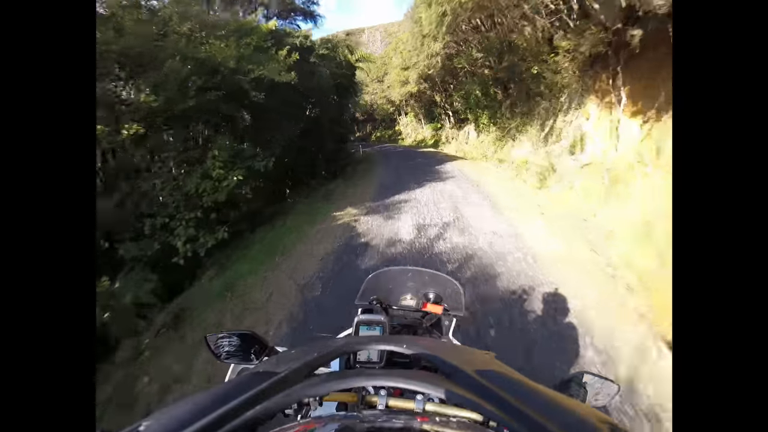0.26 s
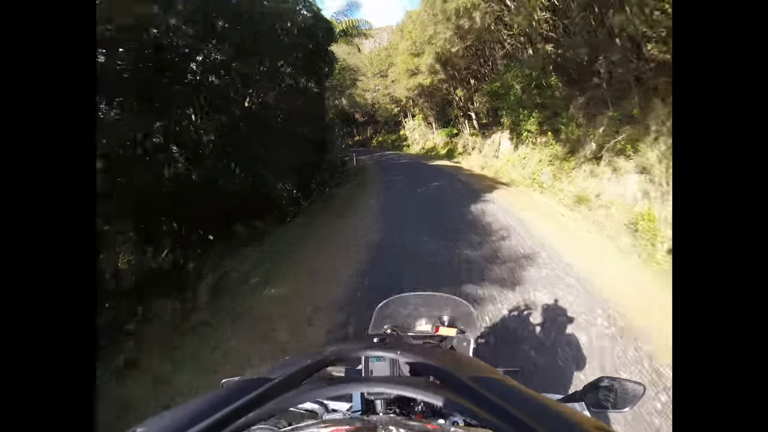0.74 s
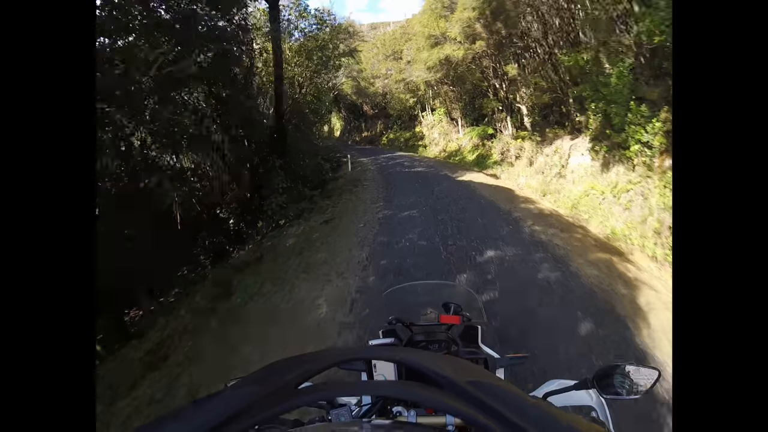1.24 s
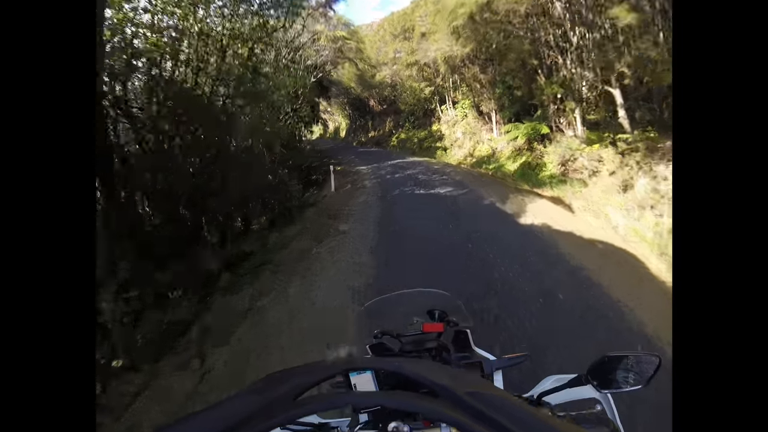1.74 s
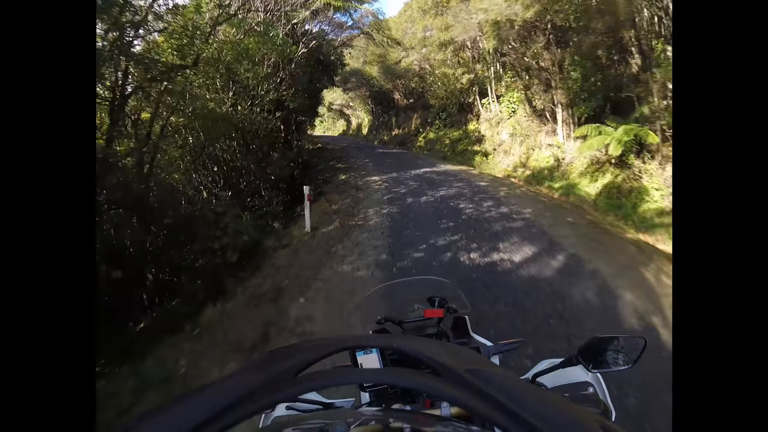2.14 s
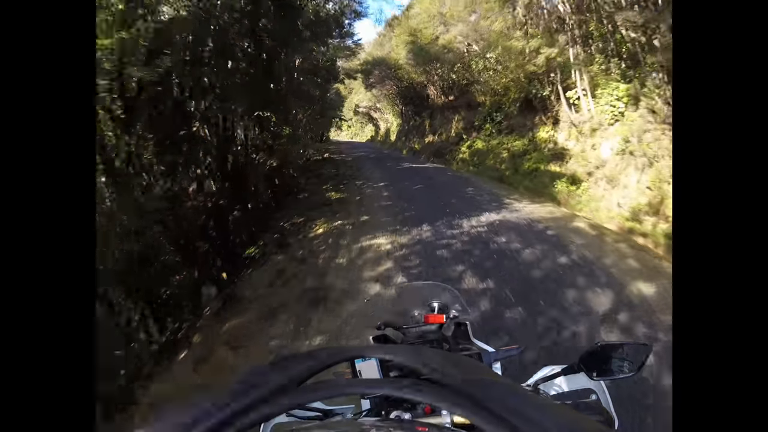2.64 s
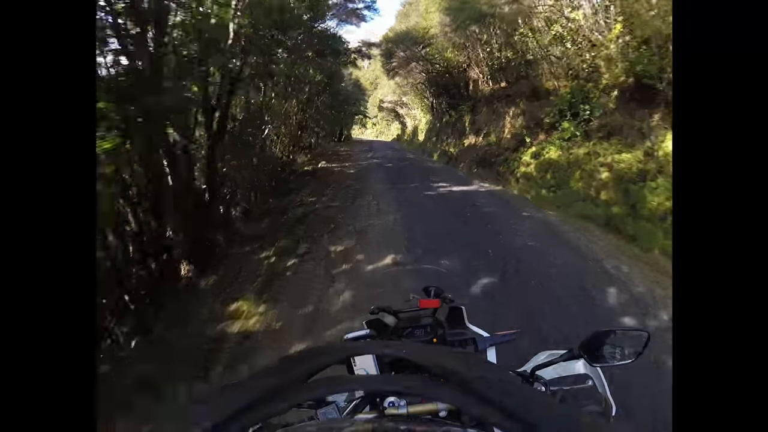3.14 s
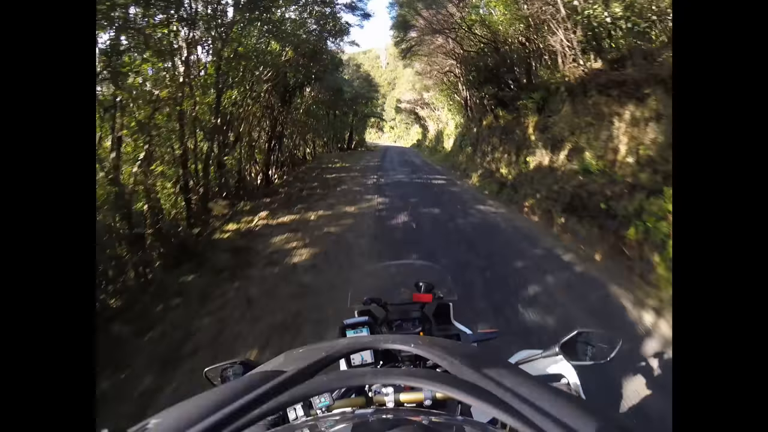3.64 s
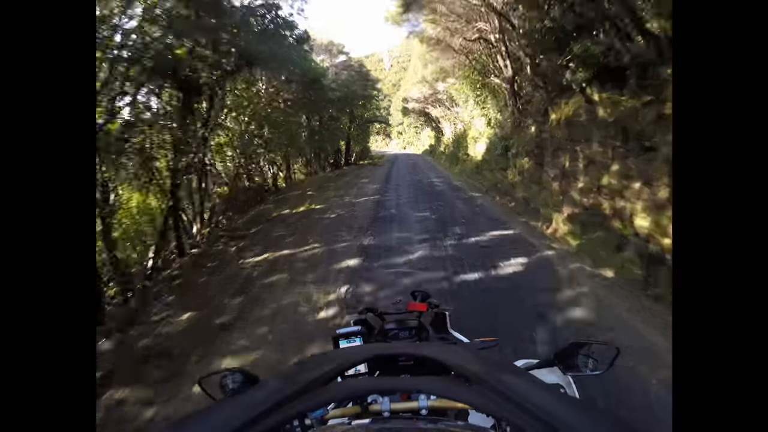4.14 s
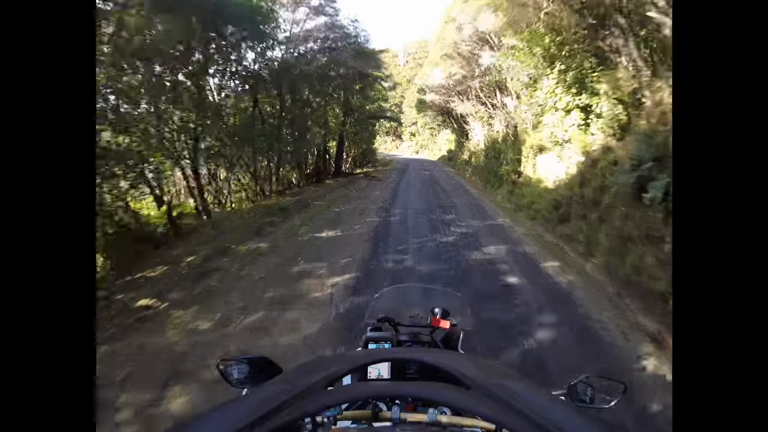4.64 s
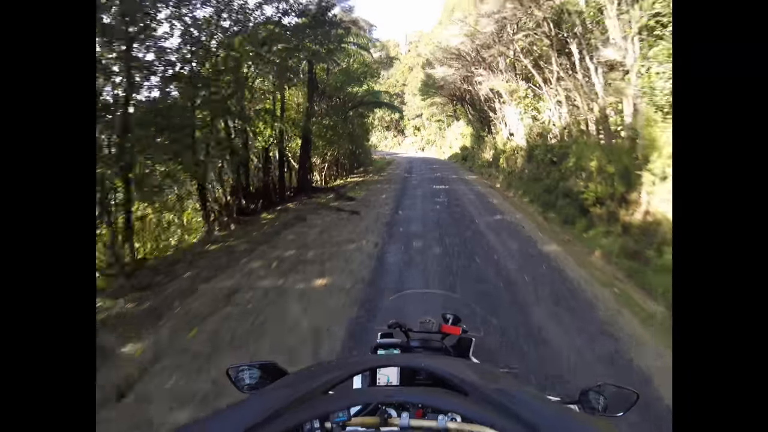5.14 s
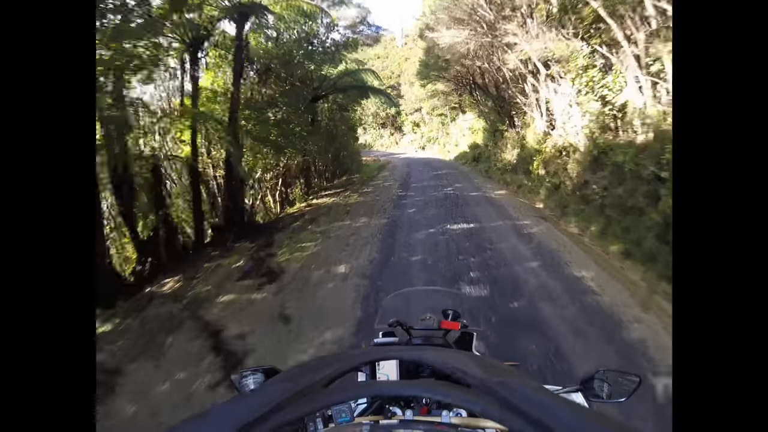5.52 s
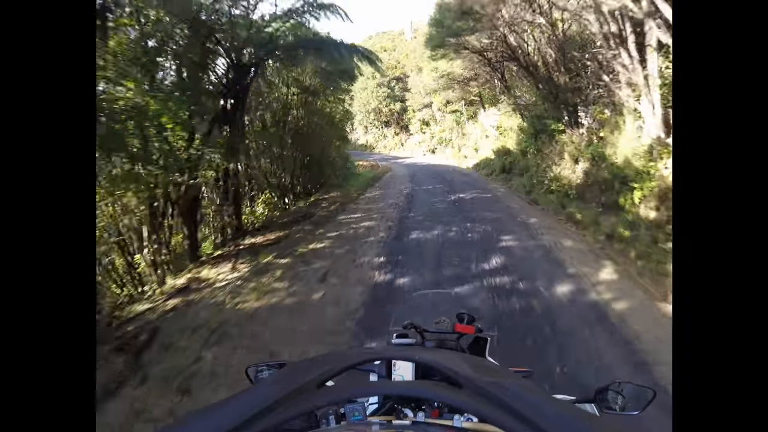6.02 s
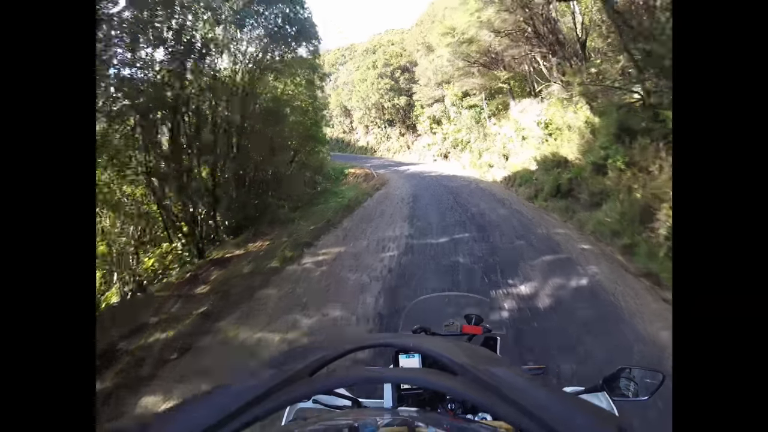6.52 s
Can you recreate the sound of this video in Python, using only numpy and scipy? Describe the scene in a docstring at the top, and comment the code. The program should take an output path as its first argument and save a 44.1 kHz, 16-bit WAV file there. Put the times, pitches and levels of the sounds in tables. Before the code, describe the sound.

Low, lumpy motorcycle engine note climbs under throttle, then drops away as it coasts, with gritty tyre roar, wind rumble, stone knocks and metallic ticks.

```python
"""A motorcycle growls along a gravel road in rushing wind, with stones knocking and metal ticking.
Its twin engine fires unevenly; each firing rings the pipe, silencer and intake as decaying tones.
The intake gets louder as the throttle opens, and a low drone comes up as the engine stops pulling.
Wind on the microphone case and tyres on gravel are shaped noise; stones and ticks are short bursts.
A gain control then holds down the loud moments."""
import sys
import numpy as np
from scipy import signal
from scipy.io import wavfile
from scipy.ndimage import uniform_filter1d

SR = 44100
rng = np.random.default_rng(int(sys.argv[2]) if len(sys.argv) > 2 else 0)


def materialize(psi):
    """Save the field psi as 16-bit PCM at rate SR to the path in sys.argv[1].

    A 1-D psi becomes a single channel; in a 2-D psi each row is a channel.
    """
    bounded = np.clip(np.atleast_2d(psi).T, -1, 1)
    quanta = np.round(bounded * 32767).astype(np.int16)
    wavfile.write(sys.argv[1], SR, quanta)


N = 298557

# Engine timing; one cycle is a full four-stroke cycle, in which both cylinders fire once
CRUISE_HZ = 26   # cycles per s at which the level laws below need no speed correction
SECOND_FIRING = 3 / 8   # a 270 degree crank fires the other cylinder 3/8 of a cycle later
SECOND_DB, UNEVEN_DB = -1.0, .6   # weaker second cylinder, spread from firing to firing
WOBBLE = .0009   # spread of the firing times, in cycles

# The second cylinder's shorter header brings its pulse out earlier, by a different lead in each part.
# The silencer and intake leads build up over a range of speed above cruise (cycles per s).
PIPE_LEAD_S = .00043
SILENCER_LEAD_S, SILENCER_LEAD_HZ = .00065, (0.6, 2.4)
INTAKE_LEAD_S, INTAKE_LEAD_HZ = .00035, (1.5, 2.6)   # the intake note also moves up over this range

# Engine level laws: (start [dB], change at full share [dB], change per cycle/s over cruise at full share [dB])
# The share is the pull for the drone, the firing strength for the crank, the opening for the intake.
DRONE_LAW, CRANK_LAW, INTAKE_LAW = (-10.5, -23, 1.6), (-21, 1.8, 0.23), (-45.5, 28.75, 0.13)
FULL_FIRING_OPENING = 0.077   # throttle opening from which the crank shakes fully
LOPE_DB = -8.5   # once-a-cycle lope, over the silencer level
SWING_DB = (2.5, 3.5, 1.3)   # how far lope, crank and drone waver
PIPE_TOP_HZ, PIPE_TOP_WIDTH_HZ = 167.2, 56.4   # the pipe's upper resonance

# Tyre level laws: (coasting [dB], gain wide open [dB], gain per cycle/s over cruise [dB])
ROAR_LAW, HISS_LAW = (-36.5, 7.03, 0.81), (-52, 7.75, 1.01)
DRIVE_SMOOTHING_S = 0.086   # the throttle is averaged this far to either side
PANEL_HZ, PANEL_WIDTH_HZ, PANEL_HITS_PER_S, PANEL_DB = 2600, 130, 300, -20   # dB over the roar
SIZZLE_HZ, SIZZLE_WIDTH_HZ = 5510, 660   # bright band in the hiss
SIZZLE_DB, SIZZLE_DB_PER_HZ = -13.5, 1   # over the hiss, and per cycle/s over cruise

GRIT_PER_S, GRIT_DB = 92, -37   # small stones; weakest blow before it rings
TICK_WIDTH = .42   # share of pitch
STONE_CLICK, TICK_CLICK = 9, 5   # first contact, against noise of spread 1
CASE_CUTOFF_HZ = 11500

CEILING_DB, SQUEEZE = -13.5, 0.35   # this share of any excess over the ceiling is taken off
RELEASE_DB_S, ATTACK_S = 60.5, 0.0036
MAKEUP_DB, CUTOFF_HZ, FADE_OUT_S = 3.0, 15600, .004


def from_db(db):
    """Turn decibels into a gain."""
    return 10 ** (np.asarray(db) / 20)


def rms_one(x):
    """Scale a sound so that its rms (average strength) is 1."""
    return x / np.sqrt(np.mean(x ** 2) + 1e-20)


def in_time(rows):
    """Read each column of a time table at every sample, joining its points by straight lines."""
    seconds, *columns = np.transpose(rows)
    return [np.interp(np.arange(N) / SR, seconds, column) for column in columns]


def drift(rate):
    """Slow random wandering of spread 1: smoothed noise, faster with a higher rate [Hz]."""
    # made at one point per 40 samples; the first 2000 points let the filter settle
    r = np.exp(-80 * np.pi * rate / SR)
    slow = signal.lfilter([1], [1, -2 * r, r * r], rng.standard_normal(N // 40 + 2002))[2000:]
    return np.interp(np.arange(N) / 40, np.arange(len(slow)), rms_one(slow))


def resonate(x, hz, width_hz):
    """Ring one resonance, with gain 1 at its peak; a narrower one rings longer."""
    r = np.exp(-np.pi * width_hz / SR)
    top = np.array([1, 0, -1]) * (1 - r * r) / 2
    return signal.lfilter(top, [1, -2 * r * np.cos(2 * np.pi * hz / SR), r * r], x)


def resonate_twice(x, hz, width_hz):
    """Pass a sound through the same resonance twice, so that its sides fall away faster."""
    return resonate(resonate(x, hz, width_hz), hz, width_hz)


def cavity(x, modes):
    """Ring a hollow part's resonances, with deep valleys between, and even out the overall level."""
    rung = 0
    for k, (hz, width_hz, db) in enumerate(modes):
        rung = rung + (-1) ** k * from_db(db) * resonate_twice(x, hz, width_hz)
    span = int(.15 * SR)   # a few engine cycles
    power = uniform_filter1d(uniform_filter1d(rung ** 2, span), span)
    return rung / np.sqrt(power + 1e-12)


def banded_noise(spectrum, patchy_db, patch_rate):
    """Noise in fifth-octave bands that flicker partly alone and partly together; rms 1."""
    hz, db = np.transpose(spectrum)
    steps = int(5 * np.log2(hz[-1] / hz[0]))
    edges = hz[0] * 2 ** (np.arange(steps + 1) / 5)
    together = drift(patch_rate / 2)
    white = rng.standard_normal((2, N))   # neighbouring bands use different noise
    out = 0
    for k, (low, high) in enumerate(zip(edges, edges[1:])):
        band_pass = signal.butter(2, [low, high], "band", fs=SR, output="sos")
        band = signal.sosfilt(band_pass, white[k % 2])
        level_db = np.interp(np.log(low * high) / 2, np.log(hz), db)
        flicker_db = patchy_db * (0.11 * together + drift(patch_rate))
        out = out + band * from_db(level_db + flicker_db)
    return rms_one(out)


def controls():
    """The rider's throttle and the engine speed over cruise, which steer engine and tyre sounds."""
    # Rider's hand: (time [s], throttle opening [0-1], pull on the driveline [0-1])
    # at pull 0 the wheel drives the engine
    throttle_curve = [(0.0, 0.47, 1), (0.07, 0.94, 0.44), (0.28, 0.89, 0.9), (0.37, 0.04, 0.47),
                      (0.5, 0.36, 0.16), (0.62, 0.27, 0.29), (0.74, 0.1, 0.2), (0.84, 0.36, 0.08),
                      (0.95, 0.4, 0.3), (1.02, 0.6, 0.8), (1.15, 0.47, 0.9), (1.3, 0.62, 0.2),
                      (1.4, 0.54, 0.07), (1.48, 0.42, 0.24), (1.6, 0.72, 0.26), (1.9, 0.71, 1),
                      (2.05, 0.93, .99), (2.22, 0.81, 1), (2.38, 0.44, 0.38), (2.55, 0.85, 1),
                      (3.25, 0.97, 0.8), (3.62, 0.86, 0.4), (3.85, 0.62, 0.66), (4.2, 0.51, 1),
                      (4.56, 0.1, .99), (4.65, 0, 1), (4.71, 0.1, 0.05), (4.79, 0.2, 0.54), (4.87, 0, 0.1),
                      (5.3, 0.27, 0.15), (5.55, 0.18, 0.13), (6.77, 0.34, 0.12)]
    # Engine speed: (time [s], speed [four-stroke cycles per s])
    speed_curve = [(0.0, 28.4), (0.17, 29.1), (0.3, 28.9), (0.36, 27.8), (0.53, 24.9), (0.63, 25.7),
                   (0.9, 25.4), (0.97, 26.8), (1.035, 28.3), (1.14, 26.3), (1.3, 26.4), (1.36, 24.9),
                   (1.42, 23.0), (1.47, 24.0), (1.59, 27.8), (1.66, 24.9), (1.74, 26.3), (1.82, 25.5),
                   (1.97, 25.6), (2.14, 26.6), (2.21, 26.1), (2.3, 26.6), (2.36, 25.6), (2.44, 26.6),
                   (2.5, 25.9), (2.55, 26.6), (2.64, 26.6), (2.69, 27.1), (2.75, 26.4), (2.82, 27.5),
                   (2.87, 27.0), (3.08, 27.6), (3.14, 28.2), (3.17, 29.5), (3.2, 28.8), (3.23, 29.5),
                   (3.28, 28.4), (3.35, 29.7), (3.385, 31.5), (3.45, 29.9), (3.59, 29.6), (3.71, 30.6),
                   (3.75, 31.6), (3.83, 31.2), (3.95, 31.8), (4.02, 32.7), (4.1, 32.1), (4.16, 32.8),
                   (4.31, 32.4), (4.35, 33.6), (4.41, 32.6), (4.46, 33.2), (4.51, 31.9), (4.6, 32.5),
                   (4.7, 31.0), (4.82, 28.8), (4.92, 30.6), (5.03, 29.7), (5.28, 28.9), (5.64, 27.1),
                   (6.22, 24.5), (6.77, 22.7)]
    opening, pull = np.clip(in_time(throttle_curve), 0, 1)
    return opening, pull, in_time(speed_curve)[0] - CRUISE_HZ


def firings(cycles, chance, lead_s):
    """One click per firing, two a cycle, each a little early or late and of its own strength."""
    due = np.arange(len(chance))[:, None] + [0, SECOND_FIRING] + WOBBLE * chance[:, :2]
    heard = due < cycles[-1]
    at = np.minimum(np.searchsorted(cycles, due), N - 1)
    lead = np.broadcast_to(lead_s, N)[at[:, 1]]
    at[:, 1] -= (lead * SR).astype(int)
    strength = from_db([0, SECOND_DB] + UNEVEN_DB * chance[:, 2:])
    clicks = np.zeros(N)
    clicks[at[heard]] = strength[heard]
    return clicks


def engine():
    """Low sine tones plus firings rung by the hollow parts; also returns each firing's puff."""
    # Level of the exhaust note: (time [s], pipe [dB], silencer [dB])
    note_curve = [(0.0, -12, -13), (0.1, -11, -14), (0.26, -8, -13.5), (0.34, -15.5, -27), (0.56, -19, -25),
                  (0.68, -25, -42), (0.81, -16, -23.5), (0.92, -19, -36), (1.02, -15.5, -33.5),
                  (1.1, -15.5, -25.5), (1.28, -16, -17.5), (1.34, -17, -25.5), (1.42, -19.5, -28),
                  (1.56, -15, -23), (1.64, -24, -34), (1.69, -15, -25), (1.9, -13, -24),
                  (2.1, -16.5, -23.5), (2.34, -16, -29.5), (2.45, -11.5, -26.5), (2.7, -11, -18.5),
                  (3.0, -13, -21.5), (3.2, -12.5, -14.5), (3.4, -13.5, -14.5), (3.8, -15.5, -15.5),
                  (4.2, -17, -18), (4.45, -15, -18.5), (4.62, -15, -39), (4.74, -21, -29), (4.92, -28, -32),
                  (5.5, -26.5, -25.5), (5.9, -21, -28.5), (6.2, -28.5, -33), (6.5, -22, -34),
                  (6.77, -21, -35)]
    # Pipe's upper resonance beside its others: (time [s], level [dB])
    pipe_top_curve = [(0, 5.5), (.3, -1.5), (.55, -7), (.9, -6), (1.0, -1), (1.25, 3), (1.45, -3),
                      (2.0, -3), (2.4, -1.5), (2.9, 7.5), (3.3, -0.5), (3.7, -1), (4.6, 4), (5.2, -4.5),
                      (6.0, -3.5), (6.77, -9)]
    # Resonances rung by the firings: (pitch [Hz], width [Hz], relative level [dB])
    pipe_modes = [(111.2, 32, 0.5), (129.3, 34, 6)]
    silencer_modes = [(213, 44, 7), (248.7, 70, 3), (298, 55, -3)]
    intake_modes = [(359.6, 65, -14.5), (424.1, 29, 8.5), (511, 122, 0), (588.3, 35.5, 2.5),
                    (646.5, 53, -12.5)]
    # The intake note sits higher at speed: (pitch [Hz], width [Hz], relative level [dB])
    intake_fast_modes = [(404, 40, -2), (468.6, 60, 5.5), (571.7, 68, 5), (647, 26, -7)]

    opening, pull, extra_hz = controls()
    cycles = np.cumsum(CRUISE_HZ + extra_hz) / SR
    pipe_db, silencer_db = in_time(note_curve)

    def law_db(share, law):
        """Level from a share of load and the engine speed."""
        start, gain, slope = law
        return start + share * (gain + slope * extra_hz)

    drone_db = law_db(pull, DRONE_LAW)
    crank_db = law_db(np.minimum(opening / FULL_FIRING_OPENING, 1), CRANK_LAW)
    intake_db = law_db(opening, INTAKE_LAW)

    # all three parts hear the same uneven firings, with their own leads
    chance = rng.standard_normal((250, 4))
    fast = np.interp(extra_hz, INTAKE_LEAD_HZ, [0, 1])
    silencer_lead_s = np.interp(extra_hz, SILENCER_LEAD_HZ, [0, SILENCER_LEAD_S])
    exhaust = firings(cycles, chance, PIPE_LEAD_S)
    suction = firings(cycles, chance, fast * INTAKE_LEAD_S)
    muffled = firings(cycles, chance, silencer_lead_s)

    # a puff swells and fades over some milliseconds after each firing; its mean is 1
    fade = np.exp(-1 / (0.0062 * SR))
    puff = signal.lfilter([1], [1, -2 * fade, fade ** 2], exhaust)
    puff = puff / puff.mean()

    def low_tone(order, db, swing_db):
        """A wavering sine that swings `order` times per engine cycle."""
        wavering_db = db + swing_db * drift(9.7)
        return np.sqrt(2) * from_db(wavering_db) * np.sin(2 * np.pi * order * cycles)

    lope = low_tone(1, silencer_db + LOPE_DB, SWING_DB[0])
    crank = low_tone(2, crank_db, SWING_DB[1])
    drone = low_tone(3, drone_db, SWING_DB[2])

    pipe_top = (PIPE_TOP_HZ, PIPE_TOP_WIDTH_HZ, in_time(pipe_top_curve)[0])
    pipe = from_db(pipe_db) * cavity(exhaust, pipe_modes + [pipe_top])
    silencer = from_db(silencer_db) * cavity(muffled, silencer_modes)
    slow_intake = np.sqrt(1 - fast) * cavity(suction, intake_modes)
    fast_intake = np.sqrt(fast) * cavity(suction, intake_fast_modes)
    intake = from_db(intake_db) * (slow_intake + fast_intake)
    # lope and pipe are turned over: pressure builds through the cycle and drops at a firing
    return crank + drone - lope - pipe + silencer + intake, puff


def wind_on_case():
    """Gusts buffet the microphone case: patchy, mostly low noise that follows the gust level."""
    # Spectrum of the wind: (pitch [Hz], relative level [dB per Hz])
    wind_spectrum = [(14, -17), (24, 0.5), (36, 2), (46, -4.5), (70, -6), (120, -7), (170, -19), (240, -16),
                     (330, -22), (600, -23.5), (900, -69)]
    # Gusts on the case: (time [s], level [dB])
    gust_curve = [(0.0, -7), (0.2, -9.5), (0.35, -10.5), (0.55, -18), (0.85, -16.5), (1.15, -12.5),
                  (2.0, -14), (2.9, -13), (3.5, -12), (4.3, -12.5), (4.8, -19), (5.5, -15), (6.1, -15),
                  (6.77, -15)]
    gust_db = in_time(gust_curve)[0]
    return from_db(gust_db) * banded_noise(wind_spectrum, patchy_db=-1.5, patch_rate=6.7)


def tyres_on_gravel(puff):
    """Roar, hiss and a ringing panel grow with throttle and speed; firings swell roar and hiss."""
    # Spectra of the tyre noise: (pitch [Hz], relative level [dB per Hz])
    roar_spectrum = [(550, -16.5), (700, 1), (900, -2), (1700, -5.5), (2100, -8), (2650, -11), (2850, -14),
                     (3600, -17.5), (4300, -36)]
    hiss_spectrum = [(3600, -4), (4300, -0.5), (4800, 0.5), (5400, 2), (6000, -2), (6800, -3), (8300, -9.5),
                     (10000, -22), (12000, -36.5), (15000, -34)]

    opening, _, extra_hz = controls()
    drive = uniform_filter1d(opening, int(2 * DRIVE_SMOOTHING_S * SR))
    roar_db, hiss_db = [coast + gain * drive + slope * extra_hz
                        for coast, gain, slope in (ROAR_LAW, HISS_LAW)]
    roar = from_db(roar_db) * banded_noise(roar_spectrum, patchy_db=-0.25, patch_rate=9.0)
    roar = roar * (1 + 0.24 * (puff - 1))
    hiss = from_db(hiss_db) * banded_noise(hiss_spectrum, patchy_db=0.5, patch_rate=76.0)
    hiss = hiss * (1 + 0.04 * (puff - 1))

    # random grit hits ring a panel
    hits = (rng.random(N) < PANEL_HITS_PER_S / SR) * rng.standard_normal(N) + 1e-18
    ringing = rms_one(resonate_twice(hits, PANEL_HZ, PANEL_WIDTH_HZ))
    panel = from_db(roar_db + PANEL_DB) * ringing

    bright = rms_one(resonate_twice(rng.standard_normal(N), SIZZLE_HZ, SIZZLE_WIDTH_HZ))
    sizzle = from_db(hiss_db + SIZZLE_DB + SIZZLE_DB_PER_HZ * extra_hz) * bright
    return roar + hiss + panel + sizzle


def grit_patter():
    """Small stones thrown up at random, each a blow dealt to one of eight broad resonances."""
    extra_db = 0.64 * np.minimum(rng.exponential(1, N), 4)
    blows = from_db(GRIT_DB + extra_db) * rng.choice([-1, 1], N)
    hit = rng.random(N) < GRIT_PER_S / SR
    dealt = rng.integers(0, 8, N)
    out = np.zeros(N)
    for k, hz in enumerate(np.geomspace(700, 2200, 8)):
        chosen = blows * hit * (dealt == k) + 1e-18
        out += resonate_twice(chosen, hz, .5 * hz) * SR / hz
    return out


def add_knock(out, s, db, hz, width_hz, t60, click):
    """Add one blow: a click and a dying burst of noise, rung twice by a broad resonance."""
    t = np.arange(int(.12 * SR)) / SR
    build_up = 1 - np.exp(-t / 0.00028)   # contact builds up over a moment
    blow = rng.standard_normal(len(t)) * from_db(-60 * t / t60) * build_up
    blow[0] = click
    burst = resonate_twice(blow, hz, width_hz)
    start = round(s * SR)
    out[start:start + len(t)] += from_db(db) * burst / np.abs(burst).max()


def metal_ticks():
    """Small metal parts tick: short, high bursts at listed times."""
    # Ticks: (time [s], peak before the case dulls it [dB], pitch [Hz], time for the blow to fall 60 dB [s])
    tick_list = [(.179, -24, 5700, 0.011), (.962, -31, 4900, .02), (.299, -44, 9800, .1),
                 (4.57, -24, 5560, 0.014), (4.621, -49, 10600, 0.08), (4.626, -28.5, 6500, 0.023),
                 (4.635, -23, 5400, 0.018), (4.661, -44, 9500, .012), (4.669, -30, 5200, 0.013),
                 (4.678, -30, 6950, 0.011), (4.683, -40, 7000, .012), (4.703, -35, 6000, .01),
                 (4.718, -42, 7000, .01), (4.745, -26, 5800, 0.014), (4.782, -28, 5100, 0.02),
                 (4.8, -41, 7400, .01), (4.873, -29, 5900, .011), (4.878, -31, 5660, 0.025),
                 (4.898, -41, 8000, .012), (4.941, -40, 5400, .012), (5.012, -34, 5300, .012),
                 (5.02, -36, 7000, .012), (5.149, -28, 5300, .012)]
    out = np.zeros(N + SR)
    for s, db, hz, t60 in tick_list:
        add_knock(out, s, db, hz, TICK_WIDTH * hz, t60, TICK_CLICK)
    return out[:N]


def stones_on_frame():
    """Larger stones knock on the frame: short, lower bursts at listed times."""
    # Stones: (time [s], peak before the case dulls it [dB], pitch [Hz], width [share of pitch],
    # time for the blow to fall 60 dB [s])
    stone_list = [(.18, -27, 2200, .5, .015), (0.751, -16.5, 750, 0.38, .03), (.94, -25, 1600, 0.33, .01),
                  (0.957, -24, 1600, .4, .03), (.963, -14, 600, 0.77, .045), (.965, -23, 1590, 0.35, .05),
                  (1.053, -30, 750, 0.43, .017), (2.054, -15.5, 940, 0.49, .029),
                  (2.075, -24, 1190, .5, .01), (2.0825, -17, 1090, 0.45, 0.014),
                  (2.398, -21, 900, 0.43, .017), (3.041, -19, 990, 0.41, .015), (3.21, -16, 1240, .5, .018),
                  (3.904, -16.5, 1490, .35, 0.0095), (3.9101, -10, 1730, 0.38, .006),
                  (3.915, -19, 1400, 0.62, 0.014), (4.2116, -9, 1000, .8, .005), (4.275, -18, 900, .5, .01),
                  (5.5665, -22.5, 1500, 0.58, .006), (5.571, -17, 1910, 0.27, 0.0058),
                  (5.579, -29, 2100, .3, .03), (5.599, -30, 2600, 0.22, .02), (6.181, -35, 2500, .4, .015)]
    out = np.zeros(N + SR)
    for s, db, hz, width, t60 in stone_list:
        add_knock(out, s, db, hz, width * hz, t60, STONE_CLICK)
    return out[:N]


def dulled_by_case(blows):
    """The microphone case takes the highest treble off every blow."""
    low_pass = signal.butter(4, CASE_CUTOFF_HZ, fs=SR, output="sos")
    return signal.sosfilt(low_pass, blows)


def scene():
    """Add engine, wind, tyres and blows at one microphone."""
    motor, puff = engine()
    blows = grit_patter() + metal_ticks() + stones_on_frame()
    return (motor + wind_on_case() + tyres_on_gravel(puff) + dulled_by_case(blows))[None]


def record(dry):
    """Turn peaks down fast and recover slowly, round them, fade the end and cut the top treble."""
    t = np.arange(N) / SR
    level_db = 20 * np.log10(np.abs(dry[0]) + 1e-6)
    # each peak is held, then let down at the release rate
    held_db = np.maximum.accumulate(level_db + RELEASE_DB_S * t) - RELEASE_DB_S * t
    wanted_cut_db = SQUEEZE * np.maximum(held_db - CEILING_DB, 0)
    lag = np.exp(-1 / (ATTACK_S * SR))
    cut_db = signal.lfilter([1 - lag], [1, -lag], wanted_cut_db)
    rounded = np.tanh(dry * from_db(MAKEUP_DB - cut_db))
    faded = rounded * np.minimum(t[::-1] / FADE_OUT_S, 1)
    return signal.sosfilt(signal.cheby2(10, 60, CUTOFF_HZ, fs=SR, output="sos"), faded)


dry = scene()
out = record(dry)
materialize(out)
```